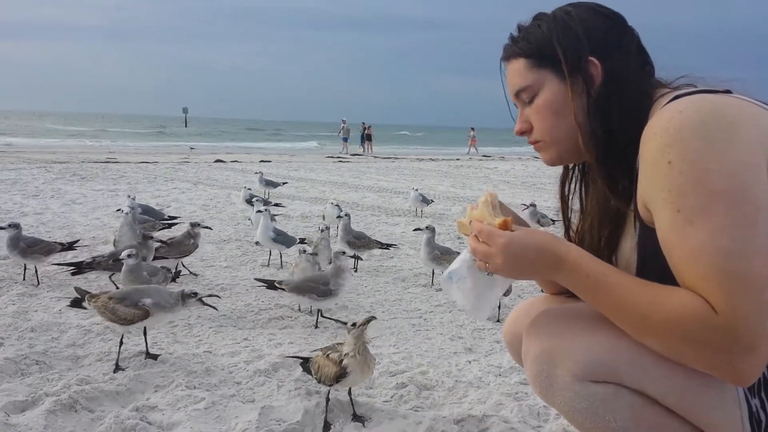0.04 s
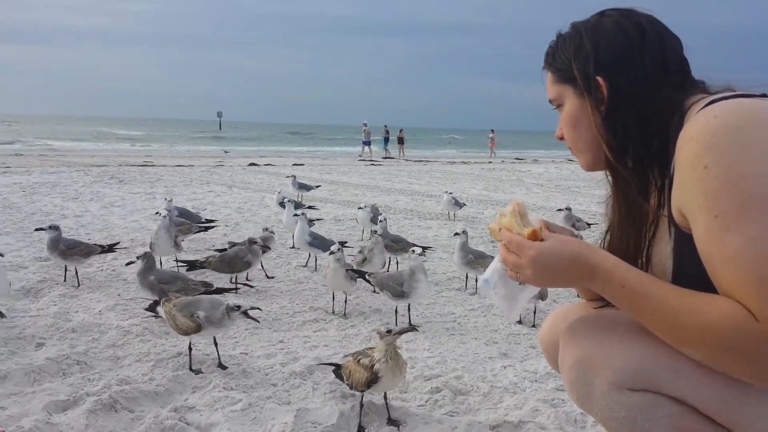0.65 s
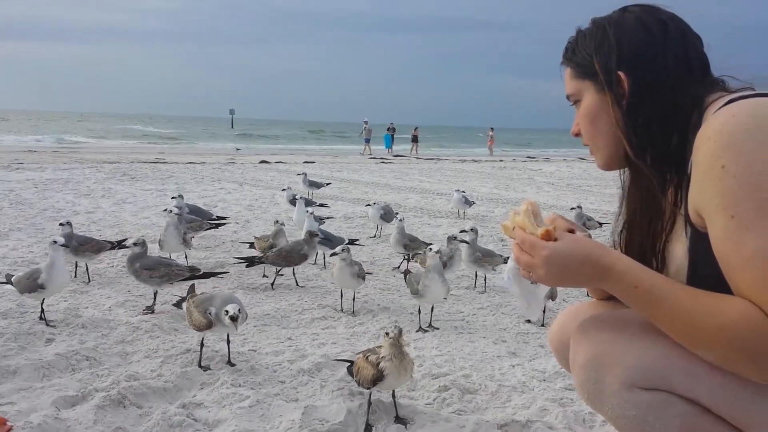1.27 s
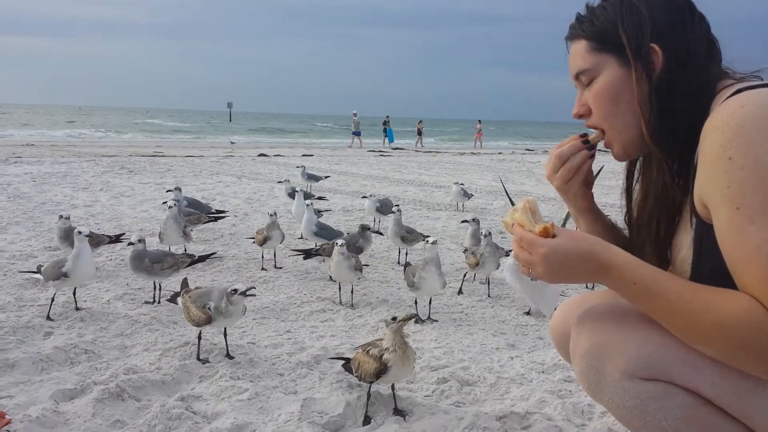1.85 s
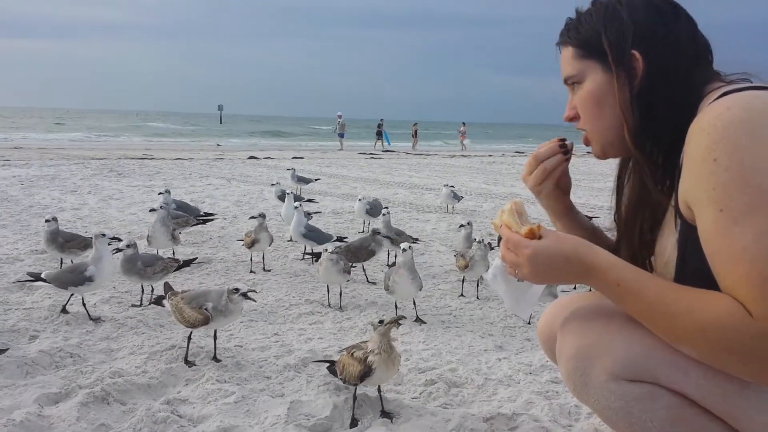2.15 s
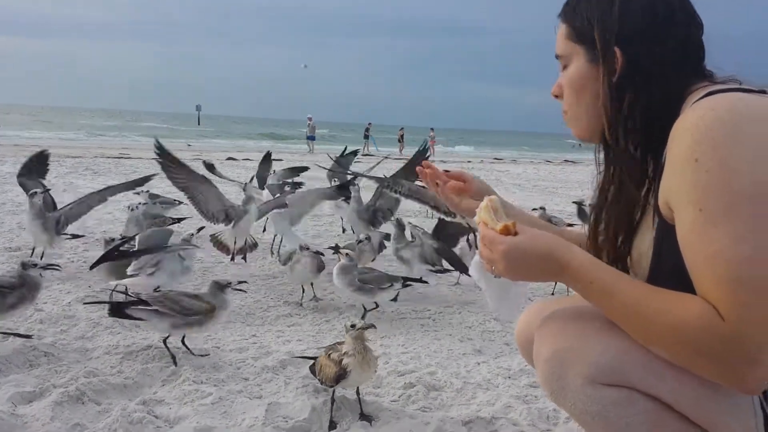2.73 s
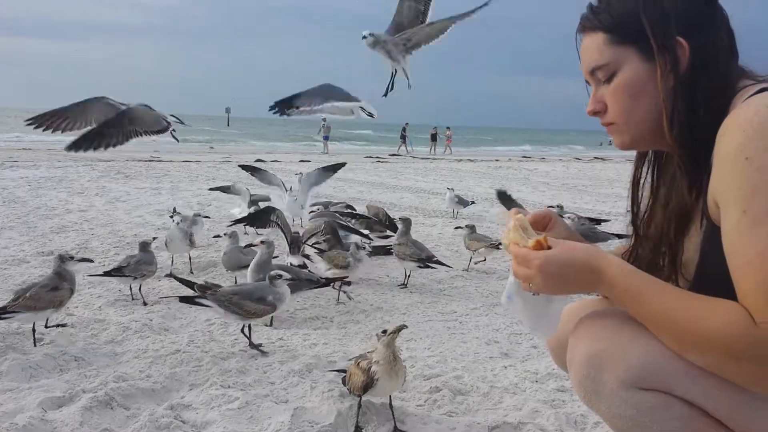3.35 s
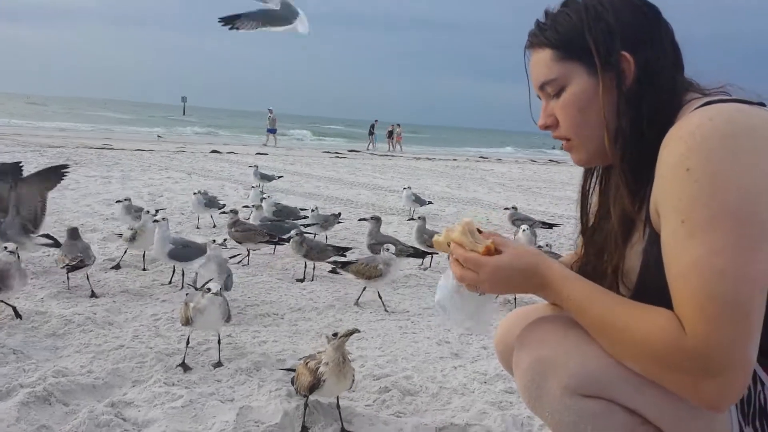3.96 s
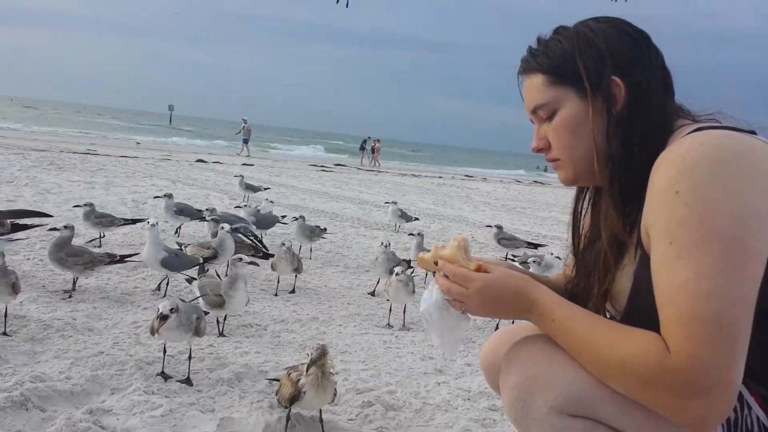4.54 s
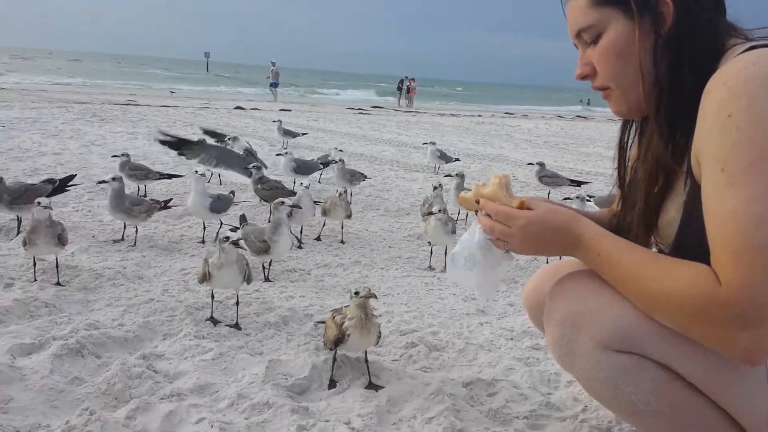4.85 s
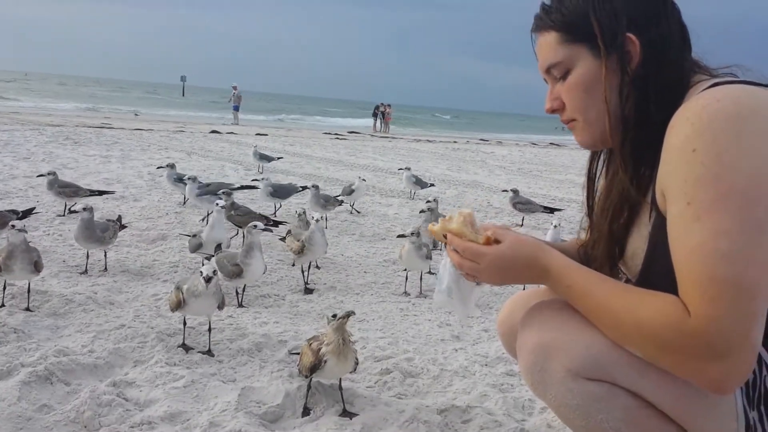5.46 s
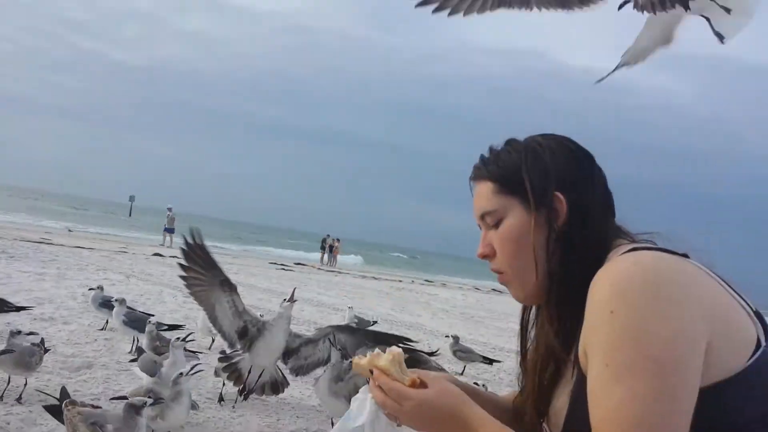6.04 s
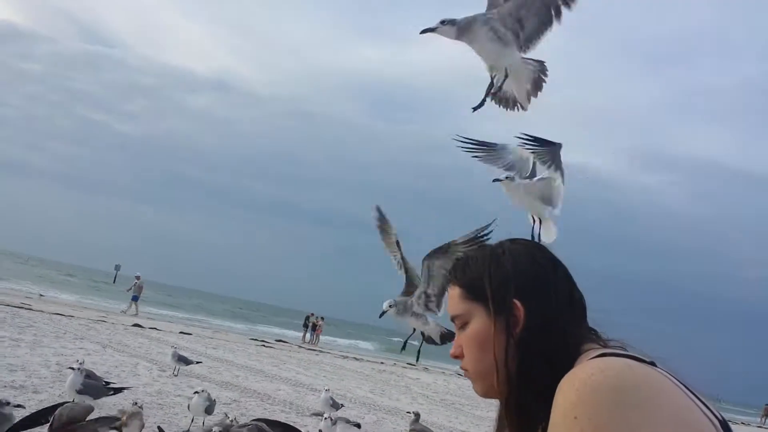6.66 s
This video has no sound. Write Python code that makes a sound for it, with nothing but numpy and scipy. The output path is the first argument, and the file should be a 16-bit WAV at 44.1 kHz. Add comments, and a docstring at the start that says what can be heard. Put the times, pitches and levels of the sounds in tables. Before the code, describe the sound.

Gulls beg for food on a beach, their thin, raspy calls overlapping above a soft wash of surf.

```python
"""A beach, a step or two from a flock of gulls begging for food.
The nearest bird squawks: a thin, arching whistle that opens and closes in a rasp, where the syrinx
beats in separate pulses that ring the throat and bill. Others whistle, rasp and snap their bills
around it. Behind them sit low surf, a blur of distant gulls and hiss, and a few wind puffs on the mic."""
import sys
import numpy as np
from scipy import signal
from scipy.fft import rfft, irfft, next_fast_len
from scipy.io import wavfile
from scipy.ndimage import uniform_filter1d, minimum_filter1d

SR = 44100
rng = np.random.default_rng(int(sys.argv[2]) if len(sys.argv) > 2 else 0)


def file_out(sig):
    """Save sig as 16-bit WAV at sys.argv[1]."""
    # one column per channel
    cols = np.atleast_2d(sig).T
    # limit, then scale
    lim = np.clip(cols, -1, 1)
    pcm = np.round(lim * 32767).astype(np.int16)
    wavfile.write(sys.argv[1], SR, pcm)


N = 295470
TIME = np.arange(N) / SR

# Squawks of the nearest bird. In all call tables, levels are set ahead of each layer's trim.
# start_s, end_s, crest_s, start_hz, crest_hz, end_hz, fundamental_db, second_db, third_db,
# fundamental_swell_db, overtone_swell_db, hoarse_db, opening_rasp_db, closing_rasp_db
BEGGING_SQUAWKS = [(0.279, 0.544, 0.51, 2886, 3093, 2920, -15, -30, -30, -1, 4.5, -19.5, -23, -21),
                   (0.781, 1.046, 0.87, 2835, 3060, 2970, -14.5, -21, -35.5, 1, 8, -19.5, -19.5, -24.5),
                   (1.285, 1.527, 1.415, 2820, 3018, 2910, -15.5, -24, -32, 6.5, 9, -18.5, -27.5, -26),
                   (1.992, 2.373, 2.25, 3064, 3744, 3270, -21.5, -38.5, -61, -13, -44, -36, -20.5, -50),
                   (2.516, 2.703, 2.68, 2813, 3130, 3170, -18.5, -18.5, -40, -2, 7.5, -14, -28, -25.5),
                   (4.061, 4.442, 4.262, 3000, 3410, 2790, -22, -21, -41, 4, -6, -25, -32, -16.5),
                   (5.308, 5.523, 5.349, 2720, 2963, 2830, -24, -27, -41.5, -11, -2, -10.5, -23.5, -25),
                   (5.876, 6.003, 5.9, 2890, 2986, 2855, -26.5, -21, -38.5, -12, 2, -8.5, -28, -25)]
# Plain whistles of the birds around it:
# start_s, end_s, crest_s, start_hz, crest_hz, end_hz, fundamental_db, second_db, third_db,
# fundamental_swell_db, overtone_swell_db, hoarse_db, left_minus_right_db, left_lag_ms
FLOCK_WHISTLES = [(0, 0.053, 0.015, 2030, 1973, 1933, -26, -26.5, -35, -6, -2, -4, -10.5, 0.14),
                  (0, 0.044, 0.0037, 3600, 3490, 3220, -25.5, -32, -46, 9, -45, -8.5, -5.5, 0.11),
                  (0.034, 0.071, 0.042, 2870, 2820, 2500, -24.5, -28, -41, -3, 1, -4, -5, 0.12),
                  (0.397, 0.46, 0.41, 2180, 2277, 2290, -20.5, -25, -23.5, -4, 0, -18.5, -7, 0.058),
                  (0.449, 0.488, 0.52, 3076, 3380, 3400, -7, -17.5, -31, -31, -16, -42, -6, 0.2),
                  (0.481, 0.798, 0.61, 2154, 2209, 1950, -24, -18, -21, 4.5, -11.5, -30, -7.5, -0.088),
                  (0.833, 1.157, 0.96, 2990, 3400, 2770, -30, -33, -64, -9, -19, -8, -5.5, 0.24),
                  (2.033, 2.1, 2.07, 2190, 2440, 2476, -10.5, -16.5, -12, 3, -3, -27, -10.5, 0.096),
                  (2.035, 2.26, 2.13, 2950, 3018, 2700, -23, -24.5, -26, -2, 5, -8, -12, 0.072),
                  (2.104, 2.375, 2.21, 2248, 2312, 2103, -39, -20, -18.5, 9, -9, -16, -8, -0.089),
                  (2.107, 2.417, 2.24, 2405, 2368, 2225, -21.5, -37, -30.5, -2.5, 11, -24, -10.5, -0.085),
                  (2.412, 2.494, 2.39, 2320, 2240, 1927, -21.5, -33, -25.5, -18, -27, -24, -11.5, -0.1),
                  (2.431, 2.462, 2.48, 3150, 3720, 3700, -21.5, -23, -54, -2, -11, -23, -7, 0.067),
                  (2.804, 2.876, 2.8, 2180, 2086, 2440, -16.5, -21.5, -26, 1, 4, -15.5, -5, -0.02),
                  (2.867, 2.962, 2.94, 4140, 4030, 3900, -22, -37, -66, 4, -12, -27, -21, 0.036),
                  (2.891, 3.005, 2.9, 3040, 3110, 2840, -21.5, -26.5, -62, -9, -12, -13.5, -5.5, -0.0017),
                  (2.941, 3.127, 3.04, 3360, 3354, 3230, -28, -28, -49, -8, 1, -10, -1, 0.033),
                  (3.039, 3.245, 3.18, 3196, 2986, 2940, -23, -29, -54, 9, -9, -11, -3, 0.047),
                  (2.962, 3.19, 2.8, 2152, 2330, 2255, -29.5, -46, -46, 0, -2, -8, -1, 0.038),
                  (3.233, 3.335, 3.27, 2080, 2184, 2043, -23, -44, -32, -10, -10, -18, -1, 0.03),
                  (3.632, 3.704, 3.705, 4100, 4520, 4615, -25.5, -40, -71, 4, 6, -29, -1, 0.14),
                  (3.72, 3.928, 3.77, 2683, 2740, 2676, -27.5, -26, -35, 1, 9, -12, -6, 0.16),
                  (3.926, 4.123, 3.96, 2630, 2663, 2645, -19, -18.5, -21, -12, -9, -10.5, -7.5, 0.12),
                  (3.895, 3.932, 3.9, 4020, 4640, 4800, -13.5, -21, -33, -6, 9, -20, -2, 0.037),
                  (4.063, 4.427, 4.28, 2036, 2302, 2030, -30, -24, -23.5, -5, -7, -7.5, -2, 0.2),
                  (4.469, 4.585, 4.59, 2310, 2926, 3000, -36, -31, -52, 4, 24, -8, -10, 0.23),
                  (4.542, 4.586, 4.63, 3960, 4460, 4420, -26, -28.5, -46, 18, -4, -30, -10, 0.24),
                  (4.58, 4.672, 4.61, 3260, 3363, 2785, -12.5, -13.5, -29.5, 6, -14, -20, -10.5, 0.147),
                  (4.687, 4.9, 4.8, 2680, 2890, 2720, -26, -40, -60, 3, 4, -12, -8.5, 0.052),
                  (4.904, 5.023, 4.98, 1920, 1890, 1710, -16.5, -38, -40, -15, -25, -17, -10, 0.2),
                  (4.91, 5.013, 3.9, 1994, 2059, 2050, -41, -21.5, -15.5, -8, -8, -7, -6, 0.09),
                  (5.555, 5.802, 5.6, 2436, 2518, 2386, -32.5, -20.5, -30.5, 17, -3.5, -24, -8.5, 0.17),
                  (5.582, 5.616, 5.616, 3030, 3460, 3365, -22, -23.5, -29, -9, -2, -35, -4, -0.024),
                  (5.614, 5.811, 5.69, 4060, 4760, 4570, -30.5, -30.5, -36, -24, -5, -47, -4, 0.085),
                  (5.801, 5.912, 5.851, 2032, 2122, 1950, -40, -27.5, -20.5, 13, 1, -4.5, -12, 0.027),
                  (6.157, 6.237, 6.192, 2233, 1906, 2200, -28.5, -30.5, -36.5, -25, 0, -12, -4.5, 0.11),
                  (6.292, 6.595, 6.44, 3025, 3640, 3494, -28, -33.5, -48, -6, -3, -8, -11, 0.12),
                  (6.343, 6.386, 6.368, 2050, 2130, 1960, -25.5, -31, -19.5, 8, 0, -8, -8.5, 0.058),
                  (6.457, 6.708, 6.7, 2242, 2320, 2216, -31, -29.5, -30.5, 1, 7, -6, -8.5, 0.13),
                  (6.471, 6.648, 6.558, 4800, 5320, 4560, -25, -49, -69, 3, 32, -42, -23, 0.23)]
# Harsh calls of the squabbling birds:
# start_s, end_s, pulse_rate_hz, throat_db, bill_db, bill_hz, rate_rise_share, jitter_0_to_1,
# left_minus_right_db
FLOCK_RASPS = [(0.064, 0.092, 418, -27.5, -34, 6800, -0.087, 0.28, -10),
               (0.386, 0.425, 480, -18, -18.5, 5470, 0.23, 0.07, -7),
               (0.625, 0.76, 444, -32, -29, 5940, -0.0036, 0.07, -11),
               (1.139, 1.207, 462, -34.5, -34.5, 5900, 0.077, 0.31, -9),
               (1.626, 1.711, 480, -32, -31.5, 5900, 0.017, 0.04, -6.5),
               (2.117, 2.353, 406.5, -39, -21.5, 5730, -0.022, 0.15, -6.5),
               (2.458, 2.519, 398, -28, -25, 4800, 0.076, 0.05, -3.5),
               (2.698, 2.822, 521, -18.5, -22.5, 5030, 0.0056, 0.1, -8.5),
               (2.764, 2.915, 697, -19.5, -25, 5950, -0.017, 0.06, -11),
               (2.831, 3.133, 552.6, -24.5, -18.5, 6300, -0.047, 0.09, -11),
               (3.097, 3.271, 472.6, -25, -30, 5830, -0.036, 0.22, -17),
               (3.706, 3.753, 540, -22.5, -13.5, 6150, -0.067, 0.22, -14),
               (3.795, 4.144, 495.6, -24.5, -22, 6650, 0.021, 0.18, -5.5),
               (4.03, 4.42, 510, -25, -19.5, 5800, 0.073, 0.18, -10),
               (4.584, 4.65, 511, -19, -15.5, 6260, -0.12, 0.35, -11),
               (4.726, 4.804, 485.4, -21, -21, 6040, -0.045, 0.16, -7.5),
               (4.84, 4.93, 508, -15.5, -17.5, 6170, 0.08, 0.25, -9),
               (4.905, 5.164, 494, -25, -39, 4300, -0.059, 0.02, -7),
               (5.735, 5.813, 452, -20.5, -18, 5360, 0.23, 0.11, -10),
               (5.796, 5.938, 517, -28.5, -18, 6500, -0.051, 0.09, -4.5),
               (6.124, 6.181, 445, -22.5, -20, 6250, 0.26, 0.09, -8.5),
               (6.219, 6.314, 492, -22, -15.5, 6450, -0.08, 0.14, -9),
               (6.333, 6.516, 521.5, -24, -17, 6500, -0.15, 0.21, -6.5),
               (6.472, 6.695, 495, -28, -24.5, 6300, -0.036, 0.16, -6.5)]
# Bills snapping shut: start_s, level_db
BILL_SNAPS = [(3.343, -26), (6.103, -18), (6.121, -18)]
# Tone colour of the background, low surf under a blur of distant gulls and hiss:
# frequency_hz, relative_level_db
BACKGROUND_SPECTRUM = [(18, -62), (30, -7), (90, 3), (288, 4), (511, -10), (1520, -14), (2030, -9.5),
                       (2430, -7), (2990, -12.5), (5730, -9), (11300, -28), (15000, -48)]
# Slow rise and fall of the background: time_s, level_db
BACKGROUND_SWELL = [(0, -40), (2.9, -41), (4.7, -34), (5.2, -38.5), (6.7, -43)]
# Boost or cut of the background's treble, the blur of gulls and hiss: time_s, gain_db
BACKGROUND_TREBLE = [(0, -5), (1.8, -2), (2.4, 1.5), (3.5, -1), (6.05, -1)]
# Puffs of wind: centre_s, half_length_s, level_db
WIND_PUFFS = [(0.822, 0.069, -24.5), (0.903, 0.0055, -13.5), (1.314, 0.29, -24), (1.91, 0.082, -30)]

BEGGAR_PAN_DB, BEGGAR_LAG_MS = -8, 0.11  # the nearest bird is heard louder on the right
SLACK_S = 0.0173  # how quickly the syrinx tightens or goes slack
TOP_HZ = 15100


def begging_gull(whistle_trim_db=2, opening_trim_db=-2.5, closing_trim_db=-1.0):
    """The lead bird: its syrinx starts in quickening beats, swells to a whistle, ends in slowing beats."""
    out = np.zeros((2, N))
    opening_s, closing_s, overlap_s, pause_s = 0.044, 0.028, 0.016, 0.00101
    for *call, opening_db, closing_db in BEGGING_SQUAWKS:
        start, end = call[:2]
        opening = rasp(opening_s, rate_hz=470, throat_db=5.5, bill_db=4.5, bill_hz=4980, rise=0.199,
                       jitter=0.031, loose=0.31, high_hz=6200, attack_share=0.22)
        closing = rasp(closing_s, rate_hz=490, throat_db=0.5, bill_db=0.0, bill_hz=4830, rise=-0.248,
                       jitter=0.033, loose=0.85, high_hz=5600)
        tone = whistle(call, slack=0.16, attack_s=0.027, release_s=0.02, flutter_db=2.0)
        parts = [(undb(opening_trim_db + opening_db) * opening, start + overlap_s - opening_s),
                 (undb(whistle_trim_db) * tone, start),
                 (undb(closing_trim_db + closing_db) * closing, end + pause_s)]
        for sound, when in parts:
            add(out, sound, when, BEGGAR_PAN_DB, BEGGAR_LAG_MS)
    return out


def whistle(call, slack=0.0285, attack_s=0.016, release_s=0.011, flutter_db=3.5):
    """A gliding tone; when hoarse, the syrinx also beats every few swings, adding in-between tones."""
    start, end, crest, start_hz, crest_hz, end_hz = call[:6]
    first_db, second_db, third_db, swell_db, overtone_swell_db, hoarse_db = call[6:]
    t = np.arange(0, end - start + release_s / 2, 1 / SR)
    n = len(t)
    hoarse = min(1.166 * undb(hoarse_db * 1.423), 1) * (1 + walk(n, 32.2) / 2)  # it comes and goes
    wobble = 0.011 * (.25 + abs(hoarse)) * walk(n, 70)
    waver = 0.012 * np.sqrt(abs(hoarse)) * walk(n, 25)
    hz = pitch_arch(t, crest - start, start_hz, crest_hz, end_hz, slack) * (1 + wobble + waver)
    swings_per_beat = np.clip(np.round(crest_hz / 560 + walk(n, 22)), 2, 8)  # hops between patterns
    beat = np.sin(2 * np.pi * np.cumsum(hz / swings_per_beat) / SR)
    grit = 0.3 * walk(n, 640)
    phase = 2 * np.pi * np.cumsum(hz) / SR + hoarse * (beat / 2 + grit)
    along = np.linspace(-.5, .5, n)
    first_db = first_db + swell_db * along
    second_db = second_db + overtone_swell_db * along
    third_db = third_db + overtone_swell_db * along
    half_db = np.maximum(first_db, second_db) + hoarse_db
    harmonics = [(1, first_db), (2, second_db), (3, third_db),
                 (4, third_db - 14), (5, third_db - 19), (6, third_db - 24)]
    in_between = [(.5, half_db - 10), (1.5, half_db), (2.5, half_db - 2),
                  (3.5, half_db - 14), (4.5, half_db - 20)]
    tone = sum(radiated(k * hz) * undb(db + flutter_db * walk(n, 40.87)) * np.sin(k * phase)
               for k, db in harmonics + in_between)
    envelope = fade(n, max(attack_s, t[-1] / 10), max(release_s, t[-1] / 10))
    return np.sqrt(2) * tone * (1 + hoarse * beat) * envelope


def pitch_arch(t, crest_s, start_hz, crest_hz, end_hz, slack):
    """Pitch curves into the crest and out again; a slackening syrinx drops it at the tail."""
    length = t[-1]
    before = np.clip(1 - t / max(crest_s, 1 / SR), 0, 1)
    after = np.clip((t - crest_s) / max(length - crest_s, 1 / SR), 0, 1)
    hz = crest_hz + (start_hz - crest_hz) * before ** 2 + (end_hz - crest_hz) * after ** 2
    return hz * (1 - slack * np.exp((t - length) / SLACK_S))


def rasp(length, rate_hz, throat_db, bill_db, bill_hz, rise, jitter,
         loose=1.0, high_hz=6630, attack_share=0.36, flutter_db=4.5, drift=0.079):
    """Beats of the syrinx ring the throat and bill, whose resonances shift as the bill moves."""
    n = int(length * SR)
    t = np.arange(n) / SR
    slack = np.exp(-t / SLACK_S) + np.exp(-t[::-1] / SLACK_S)
    scoop = -0.17 * (slack - slack.mean())  # the rate scoops up at the start and sags at the end
    wander = min(jitter / 2, 0.035) * walk(n, 35.03)
    stretch = np.clip(1 + scoop + rise * np.linspace(-.5, .5, n) + wander, .5, 2)
    chaos = jitter * abs(walk(n, 30.35)) / 2  # the beat slips in and out of order
    hz = rate_hz * stretch * np.clip(1 + chaos * walk(n, 500), .5, 2)
    k = np.arange(1, int(10000 / rate_hz))[:, None]  # harmonic numbers
    disorder = min(.3 + 5 * jitter, 1)
    sway = disorder * np.array([walk(n, 72.2) for _ in k])
    smear = disorder * np.array([walk(n, 72.2) for _ in k])
    phase = 2 * np.pi * k * np.cumsum(hz) / SR + loose * smear  # loose harmonics ring between beats
    beats = radiated(k * hz, 1563, high_hz) * undb(flutter_db * sway) * np.exp(1j * phase)
    throat_peak_hz = 2950 * stretch * (1 + drift * walk(n, 26.0))
    bill_peak_hz = bill_hz * np.sqrt(stretch) * (1 + drift * walk(n, 29.8))
    throat = np.sum(beats * resonate(k * hz, throat_peak_hz, width_hz=3740), axis=0).real
    bill = np.sum(beats * resonate(k * hz, bill_peak_hz, width_hz=1030), axis=0).real
    envelope = fade(n, length * attack_share, length * 0.22)
    roughness = undb(disorder * flutter_db * (walk(n, 400) + walk(n, 34.7) / 2))
    return (undb(throat_db) * unit(throat) + undb(bill_db) * unit(bill)) * envelope * roughness


def radiated(hz, low_hz=1400, high_hz=11500):
    """The small throat radiates little bass, and the highest partials roll off."""
    return (hz < TOP_HZ) / (1 + (low_hz / hz) ** 6) / np.sqrt(1 + (hz / high_hz) ** 6)


def near_gulls(whistle_trim_db=2, rasp_trim_db=3):
    """The birds crowding the food whistle and rasp over one another."""
    out = np.zeros((2, N))
    for *call, pan_db, lag_ms in FLOCK_WHISTLES:
        add(out, undb(whistle_trim_db) * whistle(call), call[0], pan_db, lag_ms)
    for start, end, *voice, pan_db in FLOCK_RASPS:
        add(out, undb(rasp_trim_db) * rasp(end - start, *voice), start, pan_db, lag_ms=0.08)
    return out


def bill_snaps(decay_s=0.0027, low_hz=2200, high_hz=6000):
    """A bill snapping shut gives a short, dry tick."""
    out = np.zeros((2, N))
    t = TIME[:SR // 50]
    for when, db in BILL_SNAPS:
        tick = unit(band(rng.standard_normal(len(t)), low_hz, high_hz)) * np.exp(-t / decay_s)
        add(out, undb(db) * tick, when, BEGGAR_PAN_DB, BEGGAR_LAG_MS)
    return out


def far_gulls(count=22, level_db=-50, pitch_hz=2750, hoarse_db=-10, bend=0.1):
    """Birds further down the beach give the same arching whistle, faintly."""
    out = np.zeros((2, N))
    for when, high, long, side in rng.random((count, 4)):
        crest_hz = pitch_hz * 2 ** ((high - .5) / 2)
        edge_hz = crest_hz * (1 - bend)
        length = 0.2 * (1 + long)
        call = (0, length, length / 2, edge_hz, crest_hz, edge_hz,
                level_db, level_db - 3, level_db - 17, 0, 0, hoarse_db)
        add(out, whistle(call), when * N / SR, pan_db=-10 * side, lag_ms=.2 * side)
    return out


def sand_scatter(x, wet_db=-18, decay_s=0.013):
    """Open sand throws back only a brief, faint tail."""
    t = TIME[:SR // 5]
    echo = rng.standard_normal((2, len(t))) * np.exp(-t / decay_s)
    return undb(wet_db) * signal.fftconvolve(x, unit(echo) / np.sqrt(len(t)), axes=1)[:, :N]


def surf_and_gull_blur(trim_db=0.05, lean_db=3, wash_db=1.4):
    """A noise bed: low surf, narrow in stereo, under a wide blur of distant gulls and hiss."""
    hz = np.fft.rfftfreq(N, 1 / SR)
    points_hz, points_db = np.transpose(BACKGROUND_SPECTRUM)
    colour = undb(np.interp(np.log(hz + 1), np.log(points_hz), points_db))
    mid, side = rfft(rng.standard_normal((2, N))) * colour
    side = side * np.clip(hz / 900, .45, 1)
    lean = undb(np.interp(hz, [400, 1500], [lean_db, -lean_db]) / 2)  # lows left, highs right
    bed = irfft(np.array([(mid + side) * lean, (mid - side) / lean]), N)
    body_rms = np.std(band(bed.mean(0), 200, 600, order=4))
    treble = irfft(rfft(bed) / (1 + (1500 / (hz + 1)) ** 4), N)
    treble_gain = undb(np.interp(TIME, *np.transpose(BACKGROUND_TREBLE)))
    bed = bed + treble * (treble_gain - 1)
    swell_db = np.interp(TIME, *np.transpose(BACKGROUND_SWELL)) + wash_db * walk(N, 12)
    return bed / body_rms * undb(trim_db + swell_db)


def wind(flutter_db=4.1):
    """Puffs rumble on each microphone port separately, harder on the left."""
    gust = sum(undb(db) * np.exp(-((TIME - centre) / width) ** 2) for centre, width, db in WIND_PUFFS)
    rumble = unit(band(rng.standard_normal((2, N)), 74, 170))
    return rumble * gust * undb(flutter_db * walk(N, 24.13)) * undb([[0], [-6]])


def undb(db):
    """Decibels to gain."""
    return 10 ** (np.asarray(db) / 20)


def unit(x):
    """Scale to rms 1."""
    return x / np.sqrt(np.mean(x ** 2))


def band(x, low_hz, high_hz, order=2):
    """Butterworth band-pass."""
    return signal.sosfilt(signal.butter(order, [low_hz, high_hz], "band", fs=SR, output="sos"), x)


def resonate(hz, centre_hz, width_hz):
    """Complex gain of a steep resonance at the frequencies hz."""
    return (1 + 1j * (hz ** 2 - centre_hz ** 2) / (hz * width_hz)) ** -2


def walk(n, rate_hz):
    """Smooth random modulation with a spread near 1."""
    step = max(int(SR / rate_hz), 1)
    return uniform_filter1d(np.repeat(rng.standard_normal(n // step + 1), step), step)[:n]


def fade(n, rise_s, fall_s):
    """Soft fade in and out over n samples."""
    t = np.arange(n) / SR
    return np.sin(np.pi / 2 * np.clip(np.minimum(t / rise_s, t[::-1] / fall_s), 0, 1)) ** 2


def add(out, x, start_s, pan_db, lag_ms):
    """Place a sound in stereo: pan_db is left minus right, lag_ms delays the left side."""
    size = next_fast_len(len(x) + SR // 20)
    delay = np.exp(-2j * np.pi * np.fft.rfftfreq(size, 1 / SR) * lag_ms / 1000)
    pair = irfft(rfft(x, size) * np.array([delay, np.ones_like(delay)]), size)
    gains = unit(undb([[pan_db / 2], [-pan_db / 2]]))
    i = int(np.clip(start_s * SR, 0, N - 1))
    out[:, i:i + size] += (gains * pair)[:, :N - i]


def scene():
    """Gulls up front, over a bed of surf, distant gulls and wind."""
    gulls = begging_gull() + near_gulls() + far_gulls() + bill_snaps()
    return gulls + sand_scatter(gulls) + surf_and_gull_blur() + wind()


def record(dry, knee_db=-17, squeeze=0.17, ceiling=0.85):
    """Gain control ducks under loud calls, a limiter holds the peaks and a low-pass cuts the top."""
    power = uniform_filter1d(np.mean(dry ** 2, axis=0), SR // 50)
    ducked = dry * (1 + power / undb(knee_db) ** 2) ** -squeeze
    peak_gain = ceiling / np.maximum(abs(ducked).max(axis=0), ceiling)
    limited = ducked * uniform_filter1d(minimum_filter1d(peak_gain, SR // 200), SR // 200)
    return signal.sosfilt(signal.ellip(8, .2, 70, TOP_HZ, fs=SR, output="sos"), limited)


dry = scene()
out = record(dry)
file_out(out)
```